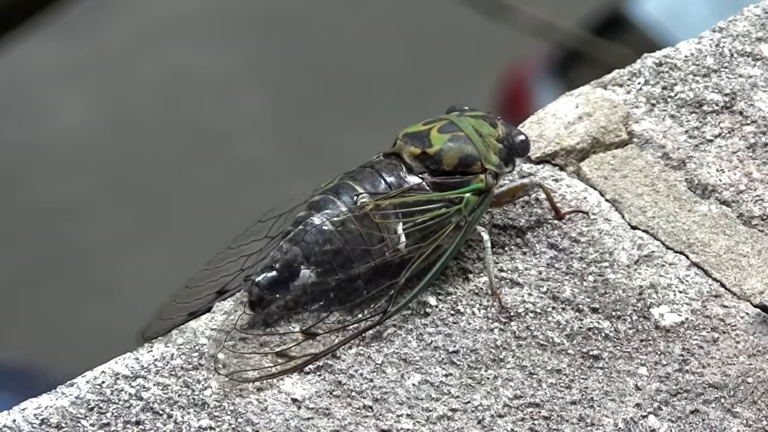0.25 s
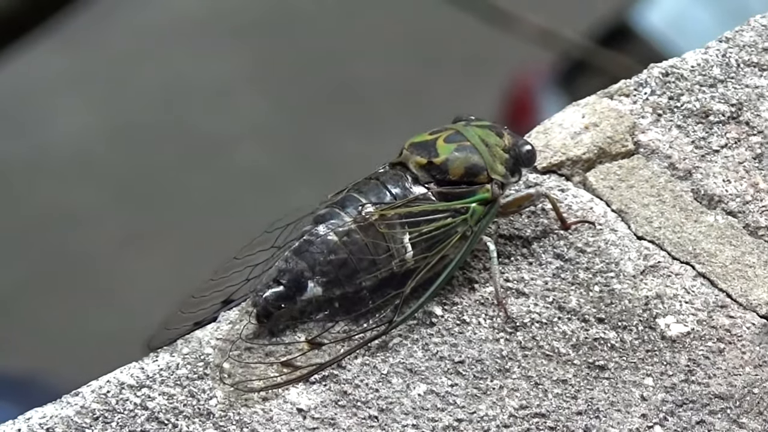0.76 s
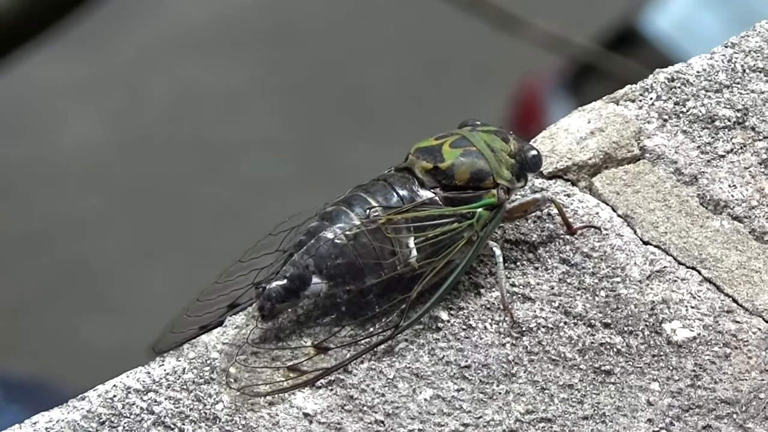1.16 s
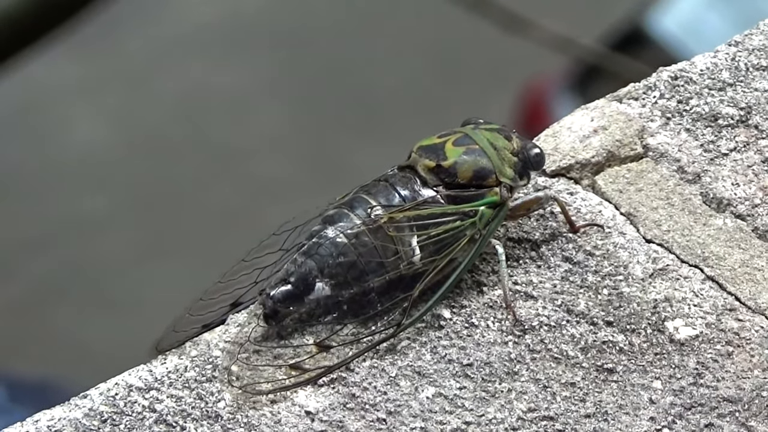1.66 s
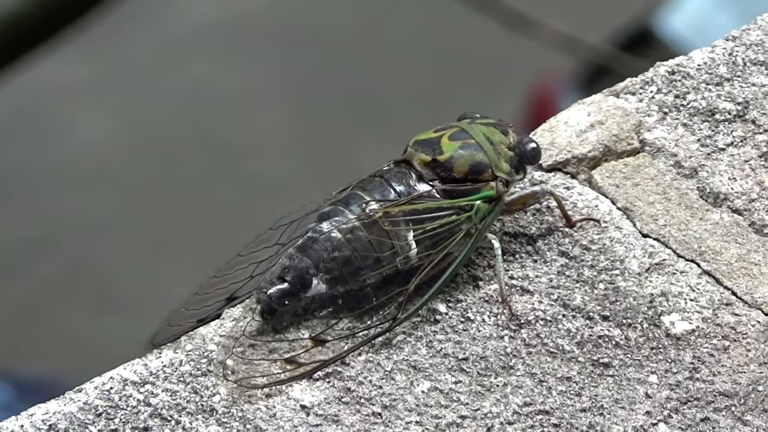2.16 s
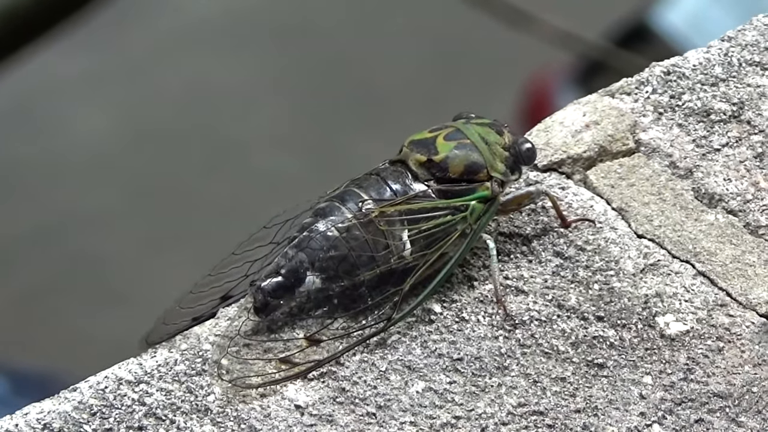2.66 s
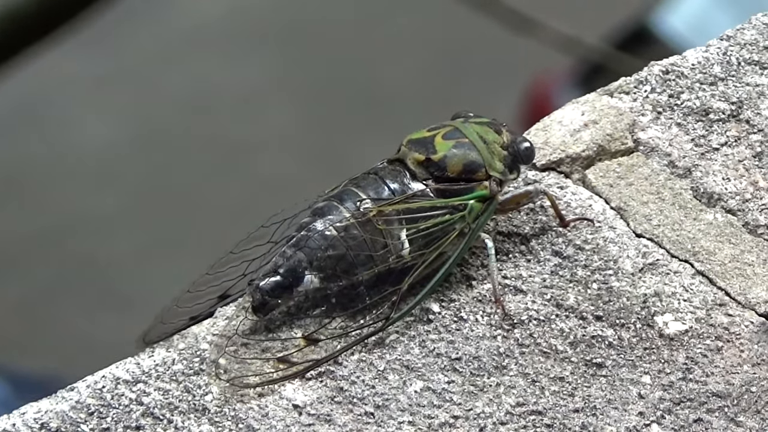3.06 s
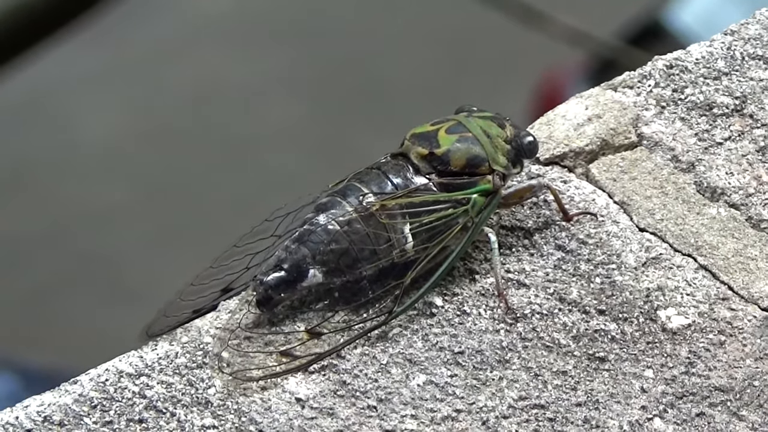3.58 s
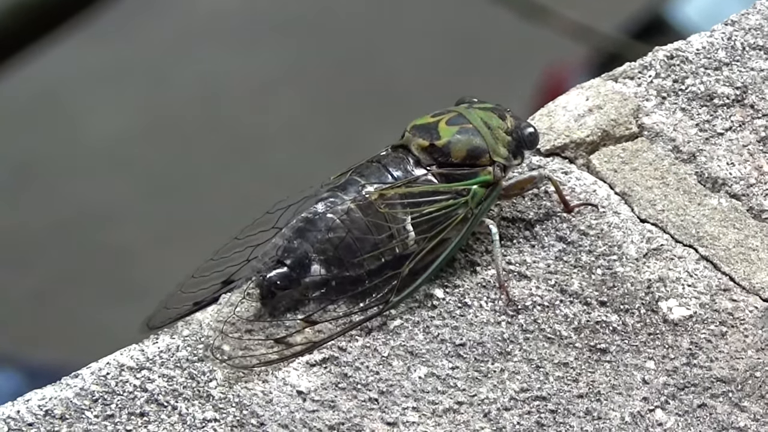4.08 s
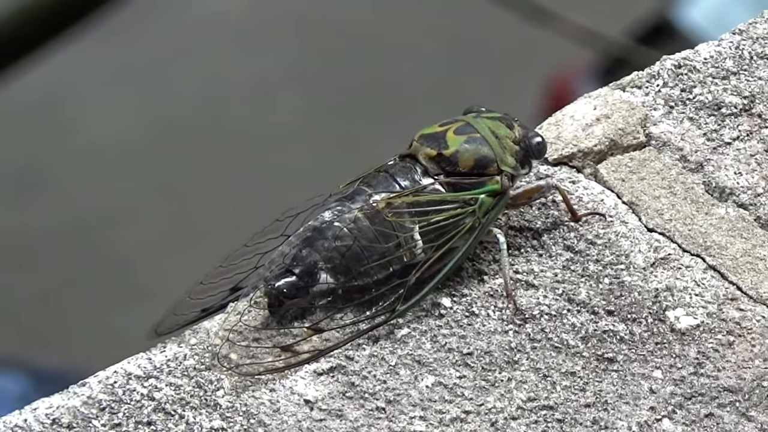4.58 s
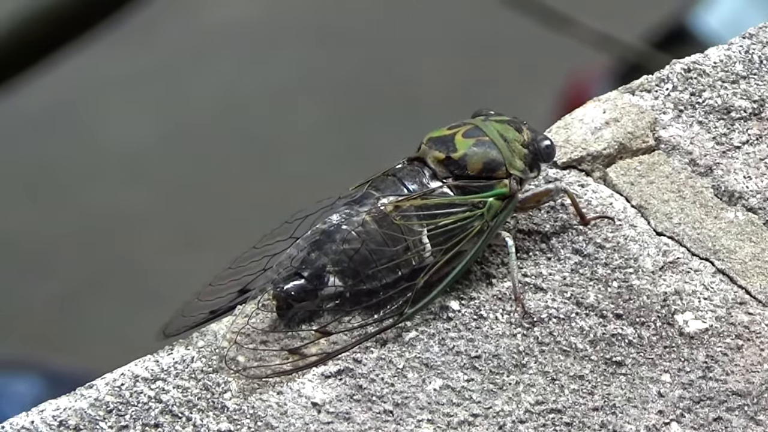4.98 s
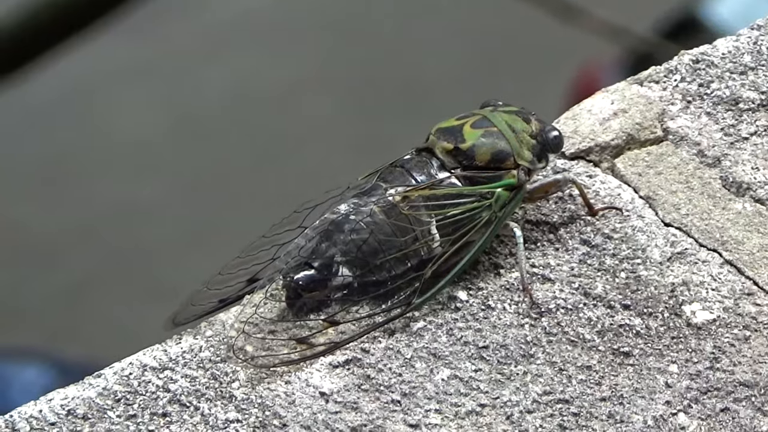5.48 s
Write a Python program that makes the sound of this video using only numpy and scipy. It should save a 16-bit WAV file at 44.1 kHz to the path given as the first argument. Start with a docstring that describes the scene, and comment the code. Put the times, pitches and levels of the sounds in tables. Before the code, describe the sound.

A cicada very close by rasps a loud, bright, dry buzz that surges and croaks three times, then slows and weakens outdoors.

```python
"""A nearby cicada's rasping song is heard at once, over a fainter second cicada and a low rumble with machine hum.
Its two tymbals buckle in turn and pop back about two milliseconds later; every click rings the same body modes.
Three times it speeds up, lifts its abdomen and croaks as it falls, with a low thump as loud clicks overload the
microphone; a fourth rush barely lifts. The song then slows and stumbles. Stone and walls reflect it."""
import sys
import numpy as np
from scipy import signal
from scipy.fft import rfft, irfft, next_fast_len
from scipy.io import wavfile
from scipy.ndimage import map_coordinates

SR = 44100
rng = np.random.default_rng(int(sys.argv[2]) if len(sys.argv) > 2 else 0)


def transcribe(u):
    """Save the signal u as a 16-bit wav file named by the first command-line argument.

    u: samples, shape (n,) or (channels, n), limited to [-1, 1]; the rate is SR.
    q: integer samples, one column per channel.
    """
    v = np.clip(np.atleast_2d(u).T, -1, 1)
    q = np.round(v * 32767).astype(np.int16)
    wavfile.write(sys.argv[1], SR, q)


N = 252693


def amp(db):
    """Decibel law: the amplitude ratio of a level in dB."""
    return 10 ** (np.asarray(db) / 20)


def unit(x):
    """Normalisation: the signal scaled to rms 1."""
    return x / np.sqrt(np.mean(x ** 2) + 1e-20)


def curves(rows, s):
    """Linear interpolation: each column after the first, read at the values s of the first."""
    first, *columns = np.transpose(rows)
    return [np.interp(s, first, column) for column in columns]


def along(points, hz):
    """Logarithmic frequency axis: (frequency [Hz], value) points joined by lines."""
    f, v = np.transpose(points)
    return np.interp(np.log(hz + 1), np.log(f + 1), v)


def wobble(rate):
    """Slow random modulation: a smooth curve through random knots, rate of them a second."""
    knots = rng.standard_normal(int(N * rate / SR) + 4)
    return map_coordinates(knots, [np.arange(N) * rate / SR])


def filtered(x, response):
    """Linear filtering: the spectrum of x times a response of frequency."""
    m = next_fast_len(N + 8192)
    return irfft(rfft(x, m) * response(np.fft.rfftfreq(m, 1 / SR)), m)[..., :N]


def shape(t, rise_s, hold_s, fall_s):
    """Raised-cosine envelope: a soft rise and a hold up to t = 0, then a soft fall."""
    ramp = np.interp(t, [-hold_s - rise_s, -hold_s, 0, fall_s], [0, 1, 1, 0])
    return np.sin(np.pi / 2 * ramp) ** 2


# Muscle rhythm without accents: (time [s], rate [cycles/s], pop-back delay [ms])
MUSCLE_RHYTHM = [(0, 132.3, 2.05), (.15, 134, 2.03), (1.83, 134.2, 2.02), (2.5, 132.7, 1.96),
                 (3.42, 127.5, 1.9), (3.47, 124, 1.88), (3.98, 118, 1.83), (4.04, 115, 1.82),
                 (4.7, 105, 1.75), (5.05, 102.5, 1.75), (5.15, 94, 1.75), (5.73, 90, 1.75)]
# Accents, timed by the fall of the abdomen: (time [s], speed-up share [0-1], lift [0-1],
# added slackness [0-1], swell [dB], croak strength [0-1])
ACCENTS = [(0.713, 0.99, 0.74, 0.1, 2.5, .4), (1.412, .98, 0.68, 0.12, 1.5, 0.63),
           (2.144, .98, 0.46, 0.18, 1.5, 0.64), (2.865, 0.58, .03, 0.1, .2, .01)]
SPEED_UP, POP_LATER_MS = 33, .22  # for a share of 1: added cycles/s, added pop-back delay
RUSH_S, RUSH_HOLD_S, RUSH_END_S = .25, .075, .022  # the rhythm: rise, hold, fall
SAG, REBOUND, REBOUND_S = .16, .11, .08  # shares of the speed-up lost in the hold and undershot after; recovery


def pace(s):
    """Frequency modulation: the tiring rhythm rushes before each accent; gives cycles/s and delay in ms."""
    rate, delay_ms = curves(MUSCLE_RHYTHM, s)
    for at, share, *_ in ACCENTS:
        t = s - at
        sag = SAG * np.clip(1 + t / RUSH_HOLD_S, 0, 1)
        rush = shape(t, RUSH_S, RUSH_HOLD_S, RUSH_END_S) * (1 - sag)
        rebound = REBOUND * np.clip(t / RUSH_END_S, 0, 1) * np.exp(-np.maximum(t, 0) / REBOUND_S)
        rate = rate + share * SPEED_UP * (rush - rebound)
        delay_ms = delay_ms + share * POP_LATER_MS * rush
    return rate, delay_ms


# The song tires: (time [s], relative song level before accents [dB], slackness before accents [0-1])
TIRING = [(0, -13.5, 0.4), (.7, -15, 0.24), (1.2, -15, 0.23), (1.5, -14.5, 0.3), (2.2, -13.5, 0.38),
          (2.9, -14, 0.21), (3.5, -14, .56), (4.0, -14.5, 0.69), (4.6, -16.5, 0.93), (5.73, -19, 1)]
LIFT_S, LIFT_HOLD_S, LIFT_END_S = 0.093, 0.056, 0.051  # the abdomen: rise, hold, fall
SWELL_S, SWELL_END_S, CROAK_S = 0.27, 0.033, 0.02  # the level: rise, fall; half length of the croak


def posture(s):
    """Variable resonator: each accent swells, slackens while lifting and croaks as the abdomen falls."""
    db, slack = curves(TIRING, s)
    lift = croak = 0
    for at, _, up, loose, swell_db, force in ACCENTS:
        t = s - at
        db = db + swell_db * shape(t + 0.023, SWELL_S, .005, SWELL_END_S)
        lift = lift + up * shape(t + 0.0086, LIFT_S, LIFT_HOLD_S, LIFT_END_S)
        slack = slack + loose * shape(t + LIFT_HOLD_S, 0.2, .01, LIFT_HOLD_S)
        croak = croak + force * np.exp(-(t / CROAK_S) ** 2)
    return db, np.clip(lift, 0, 1), np.clip(slack, 0, 1), croak


# Decay of the body modes, one entry a mode: (time to fall 60 dB [ms])
MODE_DECAY = [3.92, 4.5, 2.82, 1.58, 3.2, 3.02, 1.5, 2.4]


def clicks(s, mode_db, mode_hz, attack_ms, size=320):
    """Modal superposition: each click at s starts all body modes together, each decaying exponentially."""
    index = np.floor(s * SR).astype(int)[:, None] + np.arange(size)
    t = np.maximum(index / SR - s[:, None], 0)
    ring = 0
    for k, t60_ms in enumerate(MODE_DECAY):
        decay = amp(mode_db[:, [k]] - 6e4 * t / t60_ms)
        ring = ring + decay * np.sin(2 * np.pi * mode_hz[:, [k]] * t)
    ring = ring * (1 - np.exp(-1e3 * t / attack_ms))
    # overlapping clicks add; samples past the end collect in one spare bin
    return np.bincount(np.clip(index, 0, N).ravel(), ring.ravel(), N + 1)[:N]


# Body modes at rest, with abdomen lifted and slack; one row a mode, levels relative:
# (frequency [Hz], first buckle [dB], first pop-back [dB], second buckle [dB], second pop-back [dB])
BODY_MODES = [
    [(3675, -21.5, -30.5, -40.5, -28), (4983, -14, -31.5, -14.5, -51), (5760, -26, -7.5, -15, -5.5),
     (7630, -3, -31, -1, -31), (9570, -58, -24, -6.5, -32), (11300, -41, -45, -21, -13.5),
     (12800, -20, -19, -19, -33), (14500, -32, -40, -13, -40)],
    [(3564, -11.5, -17, -15.5, -15), (4460, -17.5, -13, -14, -15.5), (6350, -60, -21, -32, -6),
     (7510, 2, -26, -0.5, -15), (9100, -36, -18, -40, -8), (10590, -7, -5, -23, -35),
     (11870, -21, -23, -9.5, -29), (14700, -27, -29, -28, -30)],
    [(3697, -8.5, -19, -12.5, -17), (4283, -12, -30, -9, -17), (6440, -23, -11, -43, -8.5),
     (7720, -2.5, -10.5, -3, -4), (9600, -29, -23.5, -14, -26.5), (10510, -16.5, -28, -9, -15.5),
     (11770, -29, -36, 1.5, -33), (14600, -48, -35, -53, -22)],
]
# The faster the rhythm, the steadier: (rate [cycles/s], timing scatter outside croaks [ms])
STEADINESS = [(90, .5), (102, .32), (106, .26), (120, .19), (134, .1), (150, .04), (160, .016)]
EVENING = 0.036  # share of a cycle by which the second tymbal falls further behind at full speed
CROAK_MODES_DB = np.array([13.0, -3.0, -5.0, -4, -20, 0, 6, -1])  # change of each mode for a croak of 1


def tymbal(side, turn, pop_late_ms):
    """Snap-through buckling: one click inward a cycle, one back, and a stray rib click, louder in croaks."""
    t = np.arange(N) / SR
    cycles = np.cumsum(pace(t)[0]) / SR
    s = np.interp(np.arange(int(cycles[-1]) + 1) + turn, cycles, t, right=N / SR)
    rate, delay_ms = pace(s)
    effort_db, lift, slack, croak = posture(s)
    scatter_ms = curves(STEADINESS, rate)[0] + .13 * croak
    luck = rng.standard_normal((len(s), 6 + 3 * len(MODE_DECAY)))
    spread_db = luck[:, 6:].reshape(len(s), 3, -1) * (.6 + 2 * scatter_ms)[:, None, None]

    rest, lifted, loose = np.array(BODY_MODES)
    body = rest + lift[:, None, None] * (lifted - rest) + slack[:, None, None] * (loose - rest)
    # the croak swells the lowest mode and dulls most of the upper ones
    body[..., 1:] += croak[:, None, None] * CROAK_MODES_DB[:, None]
    # a faster rhythm shares the same power among more clicks
    level_db = (effort_db - 10 * np.log10(rate / 133))[:, None]
    hz = body[..., 0]
    inward_db = body[..., 1 + 2 * side] + level_db
    outward_db = body[..., 2 + 2 * side] + level_db

    # when slow and slack, the second tymbal often hurries after the first, leaving deeper gaps
    hurry_ms = side * np.clip(7 * (scatter_ms - .28) * slack * np.abs(luck[:, 5]), 0, 2)
    s = s + (scatter_ms * luck[:, 0] - hurry_ms) / 1e3
    s = s + side * EVENING * np.clip((rate - 134) / SPEED_UP, 0, 1) / rate
    back_jitter_ms = (.006 + .2 * scatter_ms ** 2) * luck[:, 1]
    back = s + (delay_ms + pop_late_ms + back_jitter_ms) / 1e3
    rib = s + (0.431 + 3.9 * scatter_ms * np.abs(luck[:, 4])) / 1e3

    buckle_db = inward_db + .5 * luck[:, [2]] + spread_db[:, 0]
    pop_db = outward_db + luck[:, [3]] + 1.5 * spread_db[:, 1]
    rib_gain_db = -24 + 14 * croak + 20 * scatter_ms * slack + 4 * luck[:, 5]
    rib_db = inward_db + rib_gain_db[:, None] + spread_db[:, 2]
    buckle = clicks(s, buckle_db, hz, attack_ms=(.045 + .05 * slack)[:, None])
    pop = clicks(back, pop_db, hz, attack_ms=.09)
    # the pop-back moves the opposite way
    return buckle - pop + clicks(rib, rib_db, hz, attack_ms=0.018)


def cicada():
    """Radiation by a small source: two tymbals just under half a cycle apart, with little sound below 2930 Hz."""
    first = tymbal(0, .01, pop_late_ms=0)
    second = tymbal(1, .452, pop_late_ms=.12)
    high_pass = signal.butter(8, 2930, "high", fs=SR, output="sos")
    return signal.sosfilt(high_pass, amp(14.5) * (first + second))


# Faces of stone close by: (delay [ms], reflection factor [-1 to 1])
STONE_ECHOES = [(1.7, -.08), (2.6, .12), (3.33, -.16), (3.7, .06)]
# One narrow, partial cancellation: (frequency [Hz], width [Hz], depth [0-1])
CANCELLED_BAND = (4760, 140, .7)


def stone(x):
    """Comb filtering: fixed echoes interfere with the direct song, and one narrow band partly cancels."""
    centre, width, depth = CANCELLED_BAND

    def response(hz):
        comb = 1 + sum(g * np.exp(-2j * np.pi * hz * ms / 1e3) for ms, g in STONE_ECHOES)
        band = 1j * hz * width / (centre * centre - hz * hz + 1j * hz * width)
        return comb * (1 - depth * band)

    return filtered(x, response)


def surroundings(x, t60):
    """Diffuse reverberation: stone and walls scatter the song, differently as the insect shifts."""
    t = np.arange(SR // 8) / SR
    tails = rng.standard_normal((3, len(t))) * amp(-60 * t / t60) * np.minimum(t / 0.00049, 1)
    # wandering shares of the song go to three decaying noise tails
    share = np.array([wobble(5) for _ in tails])
    share = share / np.linalg.norm(share, axis=0)
    wet = signal.fftconvolve(x * share, tails / np.linalg.norm(tails[0]), axes=1)[:, :N].sum(0)
    return filtered(wet, lambda hz: 1 / np.sqrt(1 + (hz / 11500) ** 4))


# Far cicada before the microphone: (time [s], mean level [dB])
FAR_CICADA = [(0, -33), (3, -33), (4.5, -30), (4.95, -28), (5.02, -25), (5.1, -29), (5.45, -28),
              (5.6, -23.5), (5.73, -23)]


def neighbour():
    """Band-limited noise: a distant cicada smeared to a flickering band with a weak, broad treble."""
    def bands(hz):
        treble = amp(-18) / (1 + ((hz - 12500) / 2500) ** 4)
        return 1 / (1 + ((hz - 6050) / 550) ** 2) + treble

    band = unit(filtered(rng.standard_normal(N), bands))
    level_db = curves(FAR_CICADA, np.arange(N) / SR)[0]
    return amp(level_db + 0.45 * wobble(170)) * band


# Background before thumps and wavering: (time [s], low noise level [dB], hum level [dB])
BACKGROUND_LEVELS = [(0, -42.5, -42), (1, -45, -44.5), (2, -42.5, -40.5), (3.3, -44.5, -43.5),
                     (3.9, -41.5, -41), (4.6, -38, -39.5), (4.8, -35, -32.5), (5.1, -38.5, -38),
                     (5.73, -34.5, -33)]
# Spectrum of rumble and thumps: (frequency [Hz], relative level per Hz [dB])
LOW_SPECTRUM = [(20, -14), (45, -7), (70, 0), (250, 0.5), (500, -2.5), (1050, -3.5), (1300, -10.5),
                (2000, -12.5), (6000, -15.5), (16000, -37)]
# Machine hum partials, about which each wavers: (frequency [Hz], level against the hum level [dB])
HUM_PARTIALS = [(90, -6.5), (180, -11.5), (262, -12), (413, -14), (760, -18.5), (1065, -15)]
OVERLOAD_THUMP_DB, OVERLOAD_THUMP_S = 7.5, 0.046  # for a croak of 1: thump height and half length


def background():
    """Noise and tones superposed: low rumble and a wavering machine hum; a low, noisy thump under each croak."""
    t = np.arange(N) / SR
    low_db, hum_db = curves(BACKGROUND_LEVELS, t)
    low_noise = unit(filtered(rng.standard_normal(N), lambda hz: amp(along(LOW_SPECTRUM, hz))))
    hum = 0
    for hz, db in HUM_PARTIALS:
        gain = amp(db + 2.4 * wobble(12))
        hum = hum + gain * np.sin(2 * np.pi * np.cumsum(hz + 0.58 * wobble(7.14)) / SR)
    # loud clicks overload the microphone: drawn as a brief rise of the same low noise
    for at, *_, force in ACCENTS:
        low_db = low_db + OVERLOAD_THUMP_DB * force * np.exp(-((t - at) / OVERLOAD_THUMP_S) ** 2)
    low_db = low_db + 1.37 * wobble(6) + 0.84 * wobble(15)
    return amp(low_db) * low_noise + amp(hum_db) * hum


def scene():
    """Superposition at one point: a single microphone position feeds both channels."""
    song = cicada()
    near = stone(song) + amp(-15) * surroundings(song, t60=.05)
    return np.tile(near + neighbour() + background(), (2, 1))


# Microphone response: (frequency [Hz], gain [dB])
MIC_RESPONSE = [(2400, -1.22), (3400, 4.5), (4400, 3), (5200, 5.5), (6200, 3.5), (7600, 6.5), (9000, 2),
                (11000, 2), (13000, -3.5), (15500, -5)]
TOP_HZ = 15730  # upper band limit


def record(dry):
    """Transducer nonlinearity: the microphone colours, bends loud clicks slightly and limits the band."""
    heard = filtered(dry, lambda hz: amp(along(MIC_RESPONSE, hz)))
    limited = heard / (1 + np.abs(heard / 1.02) ** 6) ** (1 / 6)
    bent = limited + amp(-40) * heard ** 2  # the square adds slight even-order distortion
    return filtered(bent, lambda hz: (hz > 15) & (hz < TOP_HZ))


dry = scene()
out = record(dry)
transcribe(out)
```